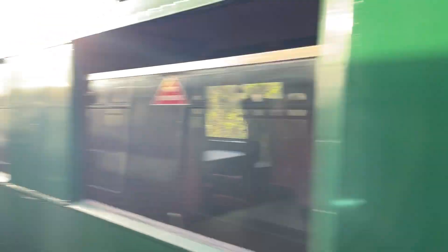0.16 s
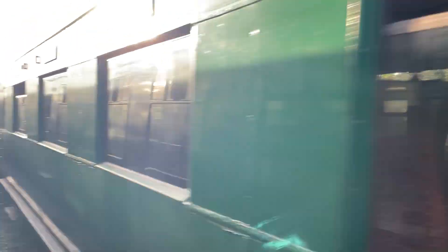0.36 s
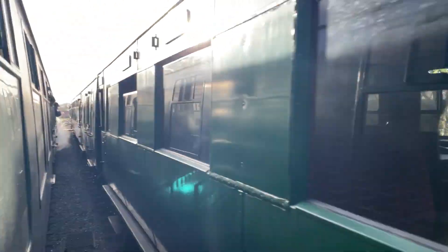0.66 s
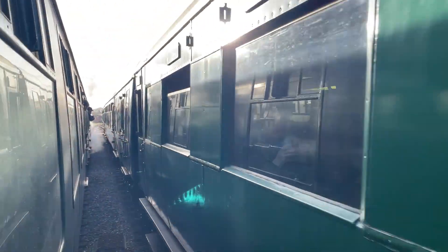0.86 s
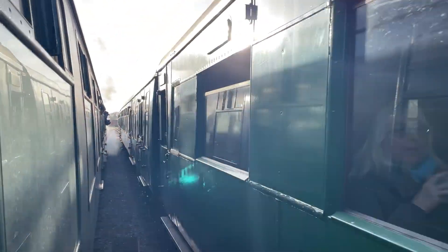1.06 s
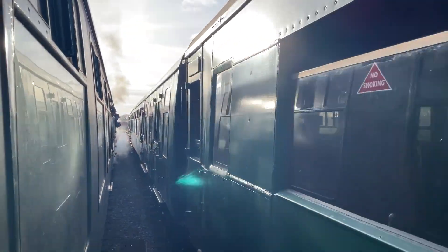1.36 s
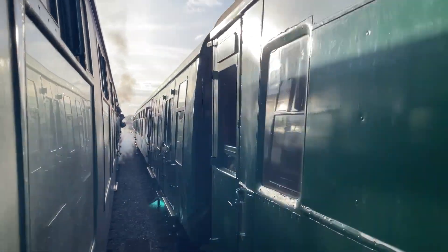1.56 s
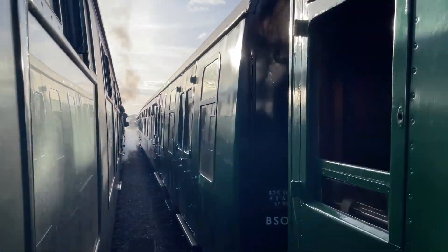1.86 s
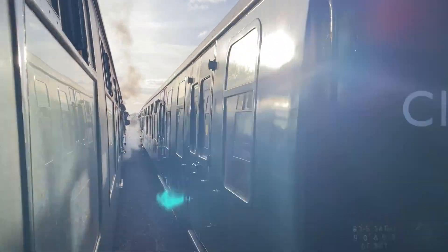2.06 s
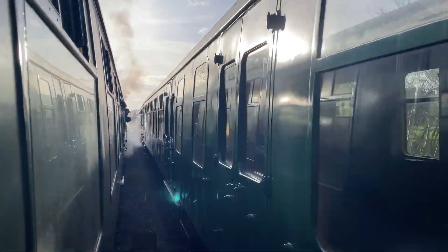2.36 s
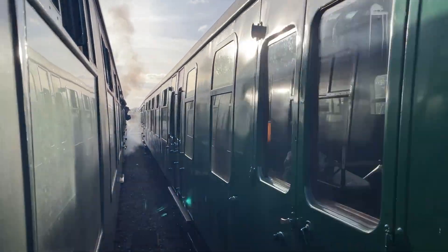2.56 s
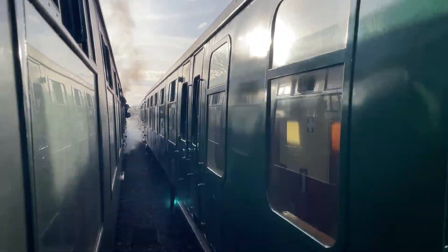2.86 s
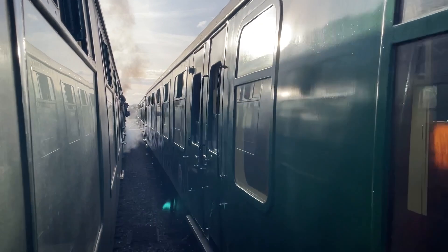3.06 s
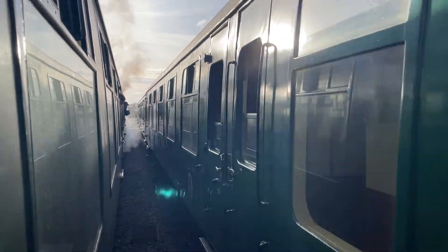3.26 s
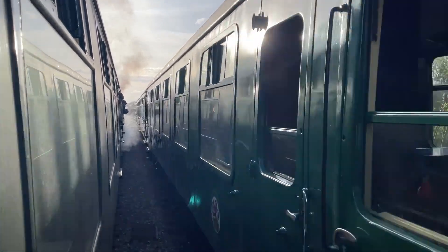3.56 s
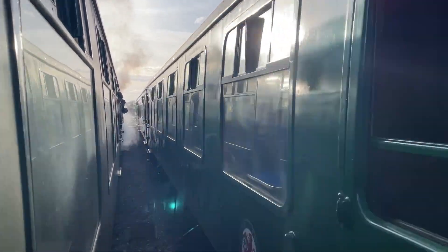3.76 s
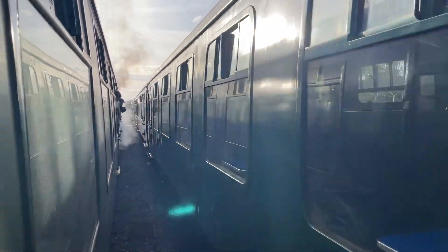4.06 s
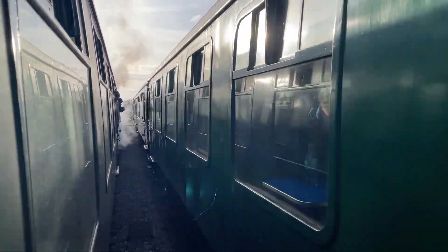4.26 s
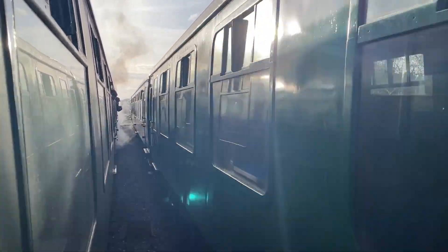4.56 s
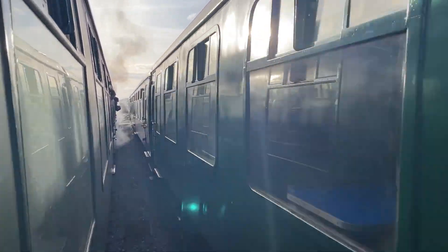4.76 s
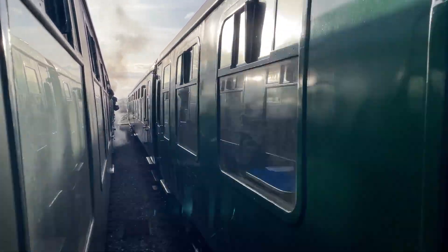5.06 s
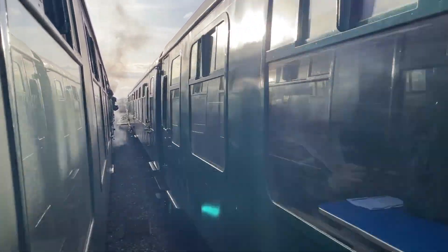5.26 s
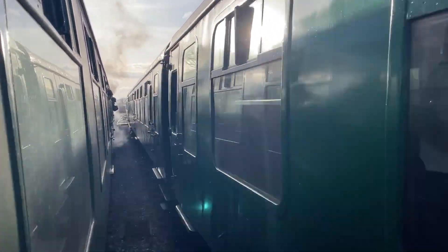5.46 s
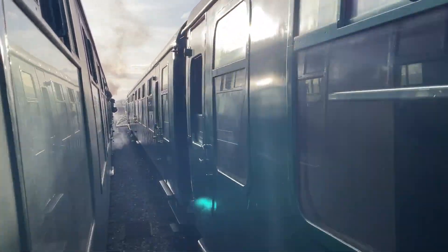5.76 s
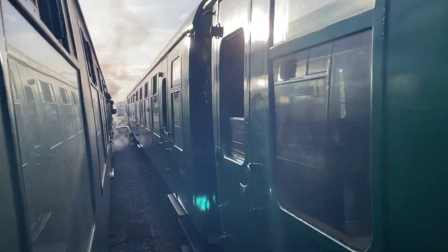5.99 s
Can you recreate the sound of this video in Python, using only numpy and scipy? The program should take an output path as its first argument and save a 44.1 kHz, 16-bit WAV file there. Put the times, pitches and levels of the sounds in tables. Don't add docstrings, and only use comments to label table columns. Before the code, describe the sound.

Close in the narrow gap between two trains, carriages roll by with rough rumble, soft roar and rail hiss over faint distant steam. Wheels start knocking loudly over joints at about one second, ringing steel and tapping links. Brake air vents with a fuzzy high whistle near three seconds, then a calmer stretch, a weaker puff, and the hardest clank. Stereo microphone near the track.

```python
import sys
import numpy as np
from scipy import signal
from scipy.fft import rfft, irfft, next_fast_len
from scipy.io import wavfile
from scipy.ndimage import uniform_filter1d

SR = 44100
rng = np.random.default_rng(int(sys.argv[2]) if len(sys.argv) > 2 else 0)


def level_to_linear(level):
    exponent = np.asarray(level, float) / 20
    return 10 ** exponent


def wav_record(signal):
    frames = np.transpose(np.atleast_2d(signal))
    bounded = np.clip(frames, -1, 1)
    quanta = np.round(bounded * 32767).astype(np.int16)
    wavfile.write(sys.argv[1], SR, quanta)


N = 270333


def evened(x):
    return x / np.sqrt(np.mean(x ** 2) + 1e-20)


def read(points, hz):
    f, value = np.transpose(points)
    return np.interp(np.log(hz + 1), np.log(f + 1), value)


def coloured(x, points):
    size = next_fast_len(x.shape[-1])
    closed_ends = [(0, -80)] + list(points) + [(SR / 2, -110)]
    gain = level_to_linear(read(closed_ends, np.fft.rfftfreq(size, 1 / SR)))
    return evened(irfft(rfft(x, size) * gain, size)[..., :x.shape[-1]])


def resonate(x, hz, width):
    return signal.lfilter(*signal.iirpeak(hz, hz / width, SR), x)


def bank(x, table):
    total = 0
    for hz, width, db in table:
        total = total + level_to_linear(db) * resonate(resonate(x, hz, width), hz, width) / np.sqrt(width)
    return evened(total)


def glide(x, hz, width):
    turn = np.exp(2j * np.pi * np.cumsum(hz) / SR)
    r = np.exp(-np.pi * width / SR)
    return (turn * signal.lfilter([1], np.convolve([1, -r], [1, -r]), x / turn)).real


def wander(rate_hz, count=N):
    size = max(int(SR / rate_hz), 2)
    return evened(uniform_filter1d(uniform_filter1d(rng.standard_normal(count), size), size))


def steadied(x, seconds):
    size = round(seconds * SR)
    power = uniform_filter1d(uniform_filter1d(x[0] ** 2, size), size)
    return evened(x / np.sqrt(power + .05))


def patchy(points, patch_db, size):
    frames, hz = 4 * N // size + 5, np.fft.rfftfreq(size, 1 / SR)
    a, b, c, d, patches = rng.standard_normal((frames, len(hz), 5)).T
    patches = evened(uniform_filter1d(uniform_filter1d(patches, size=7, axis=0), size=9, axis=1))
    z = np.array([a + 1j * b, c + 1j * d]) * level_to_linear(read(points, hz)[:, None] + patch_db * patches)
    return evened(signal.istft(z, nperseg=size, noverlap=3 * size // 4)[1][:, :N])


def add(mix, s, sound):
    part = mix[:, round(s * SR):][:, :sound.shape[1]]
    part += sound[:, :part.shape[1]]


def rolling():
    # start_s, weight_on_track_db, wheel_nearness_db, rail_rubbing_db
    bogies = [(0.0, -35, -41, -47), (0.75, -35, -35, -47), (1.19, -30, -29, -46), (1.78, -29, -27, -47),
              (2.15, -31, -28, -47), (2.44, -26, -27, -45), (2.7, -26, -29, -45), (2.88, -25, -25, -44),
              (2.99, -25, -27, -39), (3.24, -26, -31, -46), (3.58, -29, -35, -46), (4.35, -29, -34, -46),
              (4.73, -29, -30, -45), (5.05, -30, -30, -43), (5.22, -26, -28, -42), (5.43, -23, -22, -40),
              (5.8, -23, -24, -40), (6.13, -18, -20, -37)]
    # weight_db, nearness_db, rubbing_db
    usual_db = (-29, -29, -46)
    follow = {"rumble": (-27.3, 1.05, -.05, .01), "drone": (-26.5, .1, .85, -.1),
              "roar": (-36.8, -.05, .68, .3), "hiss": (-45.8, .01, -.05, 1.25)}
    # pitch_hz, level_db (per Hz)
    rumble_colour = [(18, -60), (30, -40), (50, 0), (70, 4.5), (100, 4.5), (130, -4.5), (180, -5),
                     (400, -72)]
    drone_colour = [(70, -45), (120, -10.5), (180, 7.5), (240, -2.5), (290, -0.5), (350, -8), (450, -14.5),
                    (900, -60.5)]
    roar_colour = [(200, -23), (400, -5.5), (600, 0), (800, -5.5), (1100, -8), (1400, -6), (2000, -22),
                   (4000, -72)]
    hiss_colour = [(900, -21), (1800, 3.5), (2500, -2), (3500, -4), (5500, -8), (7500, -14), (9000, -26),
                   (11000, -23), (13000, -29), (14800, -38), (16000, -70)]

    s, *controls = np.transpose(bogies)
    t = np.arange(N) / SR
    weight, near, rub = (np.interp(t, s, db) - usual for db, usual in zip(controls, usual_db))
    rumble, drone, roar, hiss = (level_to_linear(db + a * weight + b * near + c * rub)
                                 for db, a, b, c in follow.values())
    bumps_db = wander(30.5)
    out = rumble * level_to_linear(.1) * steadied(patchy(rumble_colour, patch_db=1.0, size=2048), seconds=0.13)
    sway = level_to_linear(-0.25 + 1.14 * wander(29.0))
    out += drone * sway * steadied(patchy(drone_colour, patch_db=1.04, size=1024), seconds=0.09)
    out += roar * level_to_linear(-1.52 + 0.71 * bumps_db) * patchy(roar_colour, patch_db=3.5, size=512)
    out += hiss * level_to_linear(1.6 + 1.2 * bumps_db) * patchy(hiss_colour, patch_db=1.6, size=256)
    roughness = roar * level_to_linear(32.0 + 1.1 * bumps_db) * rng.standard_normal((2, N))
    return out, roughness


def knocks():
    # start_s, peak_db, thud_over_peak_db, tick_over_peak_db, length_factor
    near_joints = [(0.926, -18, 5.5, -24, 1.1), (0.996, -14.5, 2.5, -12.5, 1.4),
                   (1.149, -19, -3, -25, 1.64), (1.504, -11.5, -3.5, -16, 1.4), (1.594, -19, 8, -23, 1.24),
                   (1.668, -21, -8, -28, 2.3), (2.272, -11, -1.5, -12, 0.99), (2.402, -21, -24, -23, 1.9),
                   (2.425, -17, -9, -33, 0.75), (2.822, -8, -3, -22, 1.6), (2.961, -17.5, -1.5, -26, 1.3),
                   (4.094, -30.5, 10.5, -8.5, 1.1), (5.331, -2.5, -4, -16.5, 0.99),
                   (5.468, -15, -5, -35, 1.2), (5.491, -7.5, -14, -24.5, 0.93), (5.848, -26, -6, -14, 0.76),
                   (5.91, -8.5, 2.5, -17, 1.4), (6.035, -15, 1.5, -27, 2.1), (6.071, -9, -2.5, -27, 1.1)]
    # start_s, peak_db, thud_over_peak_db, length_factor
    more_joints = [(0.27, -30, 10.5, 1.2), (0.395, -32, -5, 1.5), (0.556, -27, 1.5, 1.6),
                   (0.8, -33, -3, 1.6), (1.379, -31, 8, 1.1), (1.433, -29.5, -3, 3), (2.04, -36, 15, 1.2),
                   (2.084, -27.5, -12, 1.6), (2.5, -34, 15, 1.2), (3.098, -29, 11, 0.7),
                   (3.635, -30, 3, 1.2), (3.969, -28, -5, 2.1), (4.21, -39, 16, 1.3),
                   (4.446, -28.5, 5.5, 2.1), (4.528, -27.5, 0.3, 2.4), (4.606, -24, 1.5, 2.1),
                   (4.8, -34, 11, 1.3), (4.99, -32, 10.5, 1.2), (5.108, -26, 4, 1.9), (5.211, -26, -6, 1.1),
                   (5.262, -21, -6, 1.3), (5.623, -23, 8.5, 0.4), (5.711, -35, 12, 0.4)]
    # pitch_hz, level_db (per Hz)
    blow_colour = [(40, -34), (90, 3), (200, -1.5), (350, -3.5), (700, -9.5), (1400, -18.5), (2500, -35),
                   (4500, -35), (7000, -46), (10000, -51.5), (14000, -61.0)]
    shared_tick_db = -21

    t, out, drive = np.arange(SR // 2) / SR, np.zeros((2, N)), np.zeros((2, N))
    hz = np.fft.rfftfreq(len(t), 1 / SR)
    low, high = 1 / (1 + (hz / 380) ** 6), 1 / (1 + (1700 / (hz + 1)) ** 8)
    dull = 1 / (1 + (hz / 9000.) ** 4)
    colour = level_to_linear(read(blow_colour, hz))
    push = irfft(colour * low * np.exp(-2j * np.pi * hz * 0.0128), len(t))
    push /= -push.max()
    crack = (1 - np.exp(-t / 0.00042)) * level_to_linear(-11.5 - 60 * t / 0.01)
    more = [(s, db, thud, shared_tick_db, n) for s, db, thud, n in more_joints]
    for s, db, thud_db, tick_db, length in near_joints + more:
        noise = rng.standard_normal((2, len(t)))
        uneven_db = 1.7 * wander(SR / 40, count=len(hz))
        rattle = level_to_linear(2.5 * wander(300., count=len(t)))
        z = rfft(noise) * colour * level_to_linear(uneven_db)
        thud, body, tick = (evened(irfft(z * band, len(t))) for band in (low, 1 - low - high, high))
        late = irfft(rfft(tick) * dull, len(t))

        u = t / length
        rise_s = max(.0017 - .0001 * db, .001)
        onset = 1 - np.exp(-t / rise_s)
        slow_onset = 1 - np.exp(-t / (rise_s * 1.9))
        tail = level_to_linear(-13 - 60 * u / 0.66)
        sound = level_to_linear(thud_db - 5.5) * thud * slow_onset * (level_to_linear(-60 * u / 0.17) + 1.4 * tail)
        sound += level_to_linear(thud_db + 1) * push
        sound += level_to_linear(-7) * body * (crack + rattle * onset * (level_to_linear(-60 * u / 0.14) + 0.95 * tail))
        rattling_tick = rattle * onset * (tick * level_to_linear(-60 * u / 0.13) + 1.5 * late * tail)
        sound += level_to_linear(tick_db - 1.1) * (tick * crack + rattling_tick)
        add(out, s - .002, level_to_linear(db) * sound)
        add(drive, s - .002, level_to_linear(db) * noise * onset * level_to_linear(-60 * t / 0.096))
    return out, level_to_linear(19.0) * drive


def wheels(drive):
    # pitch_hz, level_db, t60_s
    resonances = [(101.8, -10.5, 0.31), (203.8, -7.5, 0.73), (288, 6, 0.36), (549.6, -15, 0.75),
                  (626.5, -8.5, 0.9), (750, -6, 0.5), (1216, -11, 0.069), (1353, -9.5, .3),
                  (1814, -13, 0.14), (2047, -18, 0.6), (2425, -17, 0.26), (2570, -37, 0.3),
                  (3156, -17.5, 0.28), (3880, -24, 0.11), (4447, -20.5, 0.83), (5040, -39, 0.11),
                  (5430, -31, 0.16), (5960, -33, .2)]
    return sum(level_to_linear(db) * np.sqrt(t60) * resonate(drive, hz, 2.36 / t60) for hz, db, t60 in resonances)


def clangs():
    # pitch_hz, level_db, t60_s
    rim_modes = [(288, 0.5, .45), (620, -12, .35), (748, -12, .6), (1346, -7, .5), (1814, -7.5, .33),
                 (2070, -19, .4), (2420, -17, .27), (2659, -22, .4), (2990, -23, .5), (3210, -19, .5),
                 (3760, -13, .33), (4445, -22, .47), (5080, -18, .28), (5860, -24, .3)]
    # pitch_hz, level_db, t60_s
    rod_modes = [(430, 3, .2), (645, -1, .14), (900, -4, .1), (1200, 1.5, .16), (2000, -8, .07),
                 (2880, -12, .12), (3600, -9, .11), (3950, -9, .1), (4150, -7, .13), (4680, -7, .12),
                 (5280, -8, .08), (5800, -8, .08)]
    # start_s, level_db, favoured_hz, spread_octaves, length_factor
    wheel_blows = [(.998, -21, 500, 1.6, 1.1), (1.152, -27, 1340, .3, 1.2), (1.508, -18, 1300, .7, .5),
                   (2.275, -19, 1900, 2.1, .8), (2.825, -21, 2900, .8, 1.3), (2.9, -19, 288, .5, 1.9),
                   (3.07, -24, 2550, .2, 2.2), (3.2, -24, 288, .5, 2.2), (5.333, -14, 2600, 3.1, 1.15),
                   (5.345, -20, 288, .6, 1.9), (5.497, -15, 600, 2.2, .6), (5.912, -20, 2600, 2.6, .9)]
    # start_s, level_db, favoured_hz, spread_octaves, length_factor
    rod_jolts = [
        (.998, -26, 4680, .15, 2.3),
        (1.508, -19.5, 1100, .6, 1.05),
        (2.277, -25, 5250, .12, 3.1),
        (2.424, -26, 1150, .7, .9),
        (2.825, -21, 1100, .7, 1.05),
        (2.84, -21, 4900, .3, 1.2),
        (4.092, -29, 5500, .6, .7),
        (4.895, -26, 4050, .15, .9),
        (4.897, -24, 430, .7, 1.05),
    ]

    t, out = np.arange(SR // 3) / SR, np.zeros((2, N))
    swell = (1 - np.exp(-t / 0.0079)) * np.cos(np.pi / 2 * t / t[-1])
    for modes, rows in ((rim_modes, wheel_blows), (rod_modes, rod_jolts)):
        for s, level_db, place_hz, spread, length in rows:
            for hz, db, t60 in modes:
                strength_db = level_db + db - 10 * (np.log2(hz / place_hz) / spread) ** 2
                if strength_db <= -75:
                    continue
                shake_db = 2.6 * wander(90., count=len(t))
                phase, split = 2 * np.pi * rng.random((2, 2, 1)), rng.uniform(0.0046, 0.0127)
                pair = np.sin(2 * np.pi * hz * t + phase[0])
                pair = pair + np.sin(2 * np.pi * hz * (1 + split) * t + phase[1]) / 2
                decay = level_to_linear(strength_db + shake_db - 60 * t / (t60 * length))
                add(out, s, decay * swell * pair)
    return out


def vent(start, opening, length, jet_db, top_hz):
    # pitch_hz, level_db (per Hz)
    jet_colour = [(300, 1), (600, -4), (1200, -7.5), (2200, -14), (3500, -16.5), (5400, -13.5),
                  (7000, -19.5), (9000, -28.7), (12000, -39), (14000, -37)]
    # pitch_hz, width_hz, level_db
    nozzle = [(2090, 60, -2), (2970, 110, -1), (3840, 280, -6), (4950, 150, -6), (7180, 340, -4),
              (8970, 170, -5), (11150, 250, -9)]
    # pitch_hz, width_hz, level_db
    overtones = [(2590, 62, -9), (3230, 90, -5), (12900, 300, -14), (13850, 200, -9), (13500, 300, -16)]
    # pitch_hz, width_hz
    high_whistle = (11830, 220)
    # middle_s, level_db, length_s
    spurts = [
        (2.846, 15, .008),
        (2.893, 5, .008),
        (3.06, 4, .01),
        (3.102, 19, .014),
        (3.162, 7, .012),
        (4.901, 4, .008),
    ]
    # middle_s, level_db, length_s
    swells = [
        (2.89, 3, .02),
        (3.04, -4, .04),
        (3.105, 4, .03),
        (4.955, -5, .008),
        (5.02, 3, .012),
        (5.06, -6, .006),
    ]
    close_s, build_s = .07, .045
    sag = .04

    t = np.arange(0, length + close_s, 1 / SR)
    u = t / length
    gate_db = -22 * np.clip(1 - t / opening, 0, 1) - 30 * np.clip((t - length) / close_s, 0, 1)
    flare_db = sum(db * np.exp(-((t + start - s) / span) ** 2) for s, db, span in spurts)
    swell_db = sum(db * np.exp(-((t + start - s) / span) ** 2) for s, db, span in swells)
    fall_db = -60 * np.maximum(u - opening / length - .17, 0) / 1.02
    jet = level_to_linear(jet_db + gate_db + .2 * flare_db + fall_db)
    build_db = -12 * np.clip(1 - t / build_s, 0, 1)
    low = level_to_linear(jet_db + gate_db - 12.5 - 8.5 * u + swell_db + build_db)
    weak_db = .6 * (jet_db + 26.5)
    high = level_to_linear(jet_db + weak_db + gate_db - 24 - 4 * u + flare_db)

    noise = rng.standard_normal((5, 2, len(t)))
    sputter_db = wander(100.0, count=len(t))
    hiss = coloured(noise[0], jet_colour) + level_to_linear(-10) * bank(noise[1], nozzle)
    sound = jet * level_to_linear(6.0 + 1.1 * sputter_db) * hiss
    whistle = steadied(evened(glide(noise[2], top_hz * (1 - sag * u), width=275.0)), seconds=.012)
    whistle = whistle + level_to_linear(-8.0) * bank(noise[3], overtones)
    sound += low * level_to_linear(7.5 + 0.55 * sputter_db) * whistle
    sound += high * level_to_linear(-0.2 + 1.8 * sputter_db) * bank(noise[4], [(*high_whistle, 0)])
    return start, sound * signal.windows.tukey(len(t), .015)


def taps():
    # start_s, peak_db, pitch_hz
    link_taps = [(1.132, -25, 624), (1.149, -19, 616), (1.435, -25, 659), (1.641, -20, 576),
                 (1.664, -15, 563), (2.084, -24, 627), (2.402, -22, 750), (2.426, -18, 700),
                 (3.971, -27, 608), (4.528, -24, 600), (4.606, -21, 552), (5.108, -22, 641),
                 (5.491, -10, 552), (5.85, -21, 721), (6.036, -19, 611)]
    # start_s, peak_db
    snaps = [
        (2.829, -33),
        (2.844, -27),
        (2.895, -33),
        (4.093, -44),
        (.927, -44),
        (2.19, -47),
        (5.333, -36),
        (4.897, -42),
        (3.012, -42),
        (3.052, -42),
    ]
    # pitch_hz, level_db (per Hz)
    snap_colour = [(3000, -20), (6000, -3), (11000, 0), (15500, -4), (17000, -40)]

    t, out = np.arange(SR // 10) / SR, np.zeros((2, N))
    for s, db, hz in link_taps:
        rasp = bank(rng.standard_normal((2, len(t))), [(1.7 * hz, 700., 0)])
        shape = level_to_linear(db - 2 - 60 * t / .045) * (1 - np.exp(-t / .0007)) ** 2
        add(out, s - .001, shape * (np.sin(2 * np.pi * hz * t) + .4 * rasp))
    for s, db in snaps:
        spit = coloured(rng.standard_normal((2, len(t))), snap_colour)
        add(out, s - .001, level_to_linear(db - 3 - 60 * t / .04) * spit)
    return out


def pings():
    # start_s, pitch_hz,
    # level_db, t60_s
    lone_modes = [(1.008, 240, -12, .15), (1.005, 1500, -33, .15), (1.03, 750, -28, .6),
                  (1.06, 290, -21, .4), (1.06, 1200, -38, .5), (1.125, 300, -24, .15),
                  (1.522, 1350, -28, .15), (1.53, 1800, -29, .12), (1.512, 130, -16, .15),
                  (1.655, 1350, -31, .25), (1.69, 800, -32, .5), (2.84, 2090, -34, .5),
                  (2.84, 3200, -36, .2), (2.85, 2660, -37, .3), (2.98, 3210, -40, .7),
                  (3.06, 3830, -43, .1), (3.11, 2650, -45, .35), (3.17, 2410, -45, .4),
                  (3.175, 3010, -46, .12), (3.39, 2500, -47, .3), (3.395, 3140, -50, .2),
                  (4.896, 3950, -35, .15), (4.9, 2850, -38, .15), (4.897, 5780, -39, .12),
                  (4.93, 5350, -42, .12), (4.966, 5330, -41, .15), (5.012, 5270, -39, .25),
                  (5.066, 5260, -43, .08), (5.332, 650, -20, .12), (5.355, 1830, -25, .3),
                  (5.36, 1360, -30, .4), (5.42, 1814, -34, .3), (5.42, 3150, -38, .4),
                  (5.51, 1350, -30, .2), (5.514, 290, -10, .15), (5.21, 1350, -33, .4),
                  (5.63, 1350, -36, .4), (3.085, 5380, -36, .3), (1.0, 4620, -40, .4),
                  (5.915, 700, -21, .1), (6.07, 600, -21, .12), (5.97, 2090, -34, .35),
                  (2.277, 300, -12, .1), (2.28, 380, -19, .2), (2.84, 280, -21, .4), (1.51, 1000, -24, .1)]
    # start_s, pitch_hz, level_db, t60_s
    more_modes = [(2.28, 1830, -30, .4), (2.36, 1800, -39, .4), (2.273, 860, -21, .07), (2.422, 1250, -29, .15),
                  (2.285, 5200, -40, .4), (2.855, 4900, -34, .3), (2.85, 5420, -33, .2), (2.85, 6050, -37, .15),
                  (2.91, 4250, -34, .08), (4.095, 5000, -40, .05), (4.898, 4050, -33, .12),
                  (4.905, 5750, -39, .1), (1.51, 320, -13, .06), (1.568, 280, -17, .12), (6.05, 300, -14, .15),
                  (5.455, 1350, -32, .15), (5.329, 310, -9, .09), (5.405, 270, -15, .25),
                  (5.335, 5600, -36, .15)]
    # middle_s, pitch_hz, level_db, half_length_s
    groans = [(.3, 95, -26, .05), (.42, 440, -42, .06), (.62, 630, -42, .06), (2.3, 70, -22, .06),
              (3.22, 115, -26, .05), (3.29, 210, -27, .05), (3.47, 102, -26, .08), (3.65, 200, -30, .05),
              (3.76, 280, -33, .04), (3.91, 152, -27, .04), (3.98, 605, -38, .04), (4.0, 850, -40, .05),
              (4.13, 90, -28, .05), (4.22, 95, -26, .05), (4.31, 165, -30, .05), (4.6, 730, -36, .04),
              (4.7, 285, -31, .08), (5.19, 290, -27, .05)]

    t, out = np.arange(SR // 3) / SR, np.zeros((2, N))
    middle = t[-1] / 2
    shape = (1 - np.exp(-t / .006)) * np.cos(np.pi / 2 * t / t[-1])
    for s, hz, db, t60 in lone_modes + more_modes:
        tone = np.sin(2 * np.pi * (hz * t + rng.random()))
        decay = level_to_linear(db + 3.2 * wander(90., count=len(t)) - 60 * t / t60)
        add(out, s, (decay * shape * tone)[None])
    for s, hz, db, half in groans:
        tone = np.sin(2 * np.pi * (hz * t + rng.random()))
        add(out, s - middle, (level_to_linear(db) * np.exp(-((t - middle) / half) ** 2) * tone)[None])
    return out


def hums():
    # middle_s, pitch_hz, level_db, half_length_s
    songs = [(.25, 1380, -52, .12), (.48, 1900, -50, .05), (.62, 1350, -49, .08), (.7, 2000, -54, .08),
             (3.45, 730, -49, .2), (3.4, 1400, -51, .12), (3.52, 1850, -52, .05), (3.68, 2080, -51, .08),
             (3.8, 1400, -51, .2), (4.15, 1900, -52, .15), (4.5, 1350, -49, .12), (4.68, 1450, -50, .08),
             (1.75, 285, -34, .2), (2.3, 270, -29, .07)]

    t, out = np.arange(SR // 2) / SR, np.zeros((2, N))
    middle = t[-1] / 2
    for s, hz, db, half in songs:
        path_hz = hz * (1 + .012 * wander(12., count=len(t)))
        band = evened(glide(rng.standard_normal((2, len(t))), path_hz, width=50))
        shape = np.exp(-((t - middle) / half) ** 2) * signal.windows.tukey(len(t), .2)
        add(out, max(s - middle, 0), level_to_linear(db) * shape * band)
    return out


def far_steam():
    # pitch_hz, level_db (per Hz)
    steam_colour = [(1000, 0), (2500, -5), (5500, -6), (7500, -4), (9000, -8.5), (11000, -17), (13000, -20),
                    (14800, -31), (16000, -70)]
    return level_to_linear(-48.5) * patchy(steam_colour, patch_db=1.9, size=256)


def scene():
    # start_s, opening_s, length_s, jet_db, whistle_hz
    releases = [
        (2.82, .03, .36, -26.5, 5570),
        (4.892, .007, .175, -35, 5480),
    ]

    roll, roughness = rolling()
    knock, blows = knocks()
    out = roll + knock + wheels(roughness + blows) + clangs()
    for row in releases:
        add(out, *vent(*row))
    out += taps() + pings()
    out += hums() + hums()
    return out + far_steam()


def band_limit(x):
    return signal.sosfilt(signal.butter(12, 14400, fs=SR, output="sos"), x)


def record(dry):
    # pitch_hz, likeness (0-1), right_lead_rad, left_over_right_db
    ports = [(0, 0.95, .01, 1.6), (566, 0.83, 0.3, 0), (900, 0.08, 1.1, .8), (1860, 0.44, 4.3, 2.5),
             (2600, 0.28, 6, -1.5), (4750, 0.14, 5.6, -0.5), (7100, 0.5, 14.9, 1.5), (7640, 0.9, 15.7, 3.4),
             (8150, .95, 15.55, 1.6), (8800, 1, 15.28, -1), (10200, .68, 13.43, .01),
             (10600, 0.85, 12.57, 1), (12250, .999, 12.57, .01), (12900, .5, 11.1, .01),
             (13800, .999, 9.42, 2)]

    edge = SR // 10
    size = next_fast_len(N + 2 * edge)
    hz = np.fft.rfftfreq(size, 1 / SR)
    f, *columns = np.transpose(ports)
    same, lead, balance_db = (np.interp(hz, f, c) for c in columns)
    same = np.clip(same, 0, 1)
    a, b = rfft(np.pad(dry, ((0, 0), (edge, edge)), "reflect"), size)
    left = a * level_to_linear(balance_db / 2)
    right = (same * np.exp(1j * lead) * a + np.sqrt(1 - same ** 2) * b) * level_to_linear(-balance_db / 2)
    pair = irfft(np.array([left, right]), size)[:, edge:edge + N]
    pair = 1.05 * np.tanh(pair / 1.05)
    pair = pair * np.minimum(np.arange(N, 0, -1) / 300, 1)
    return band_limit(pair)


dry = scene()
out = record(dry)
wav_record(out)
```